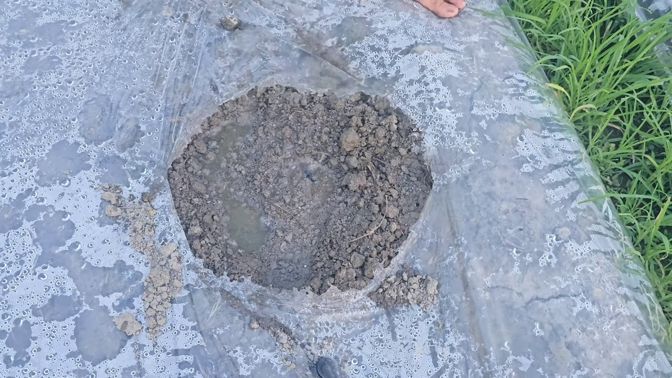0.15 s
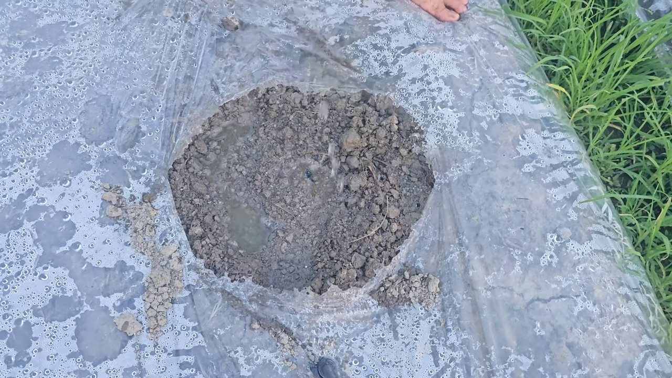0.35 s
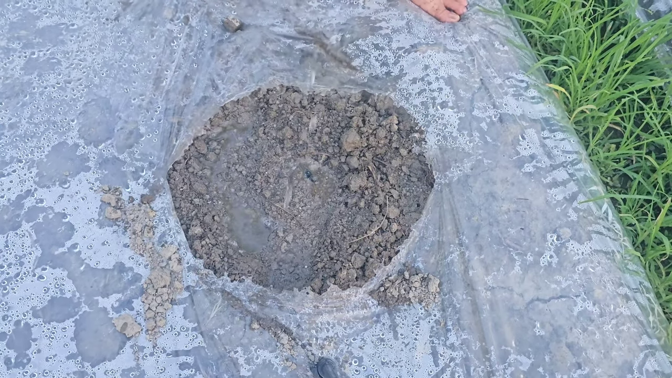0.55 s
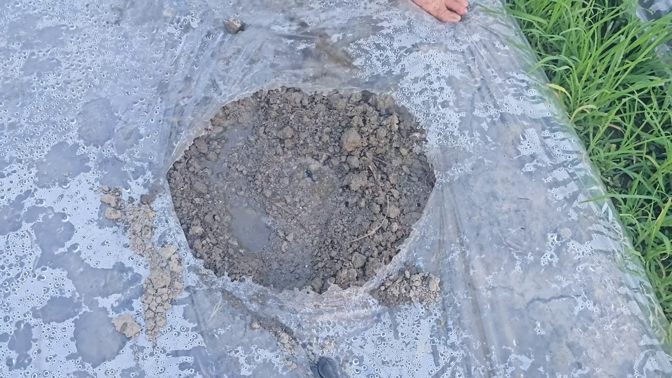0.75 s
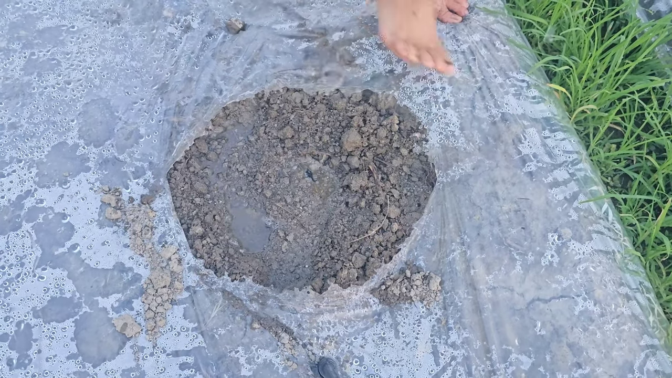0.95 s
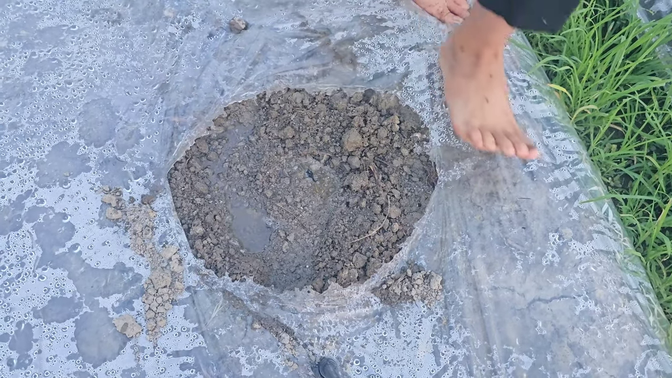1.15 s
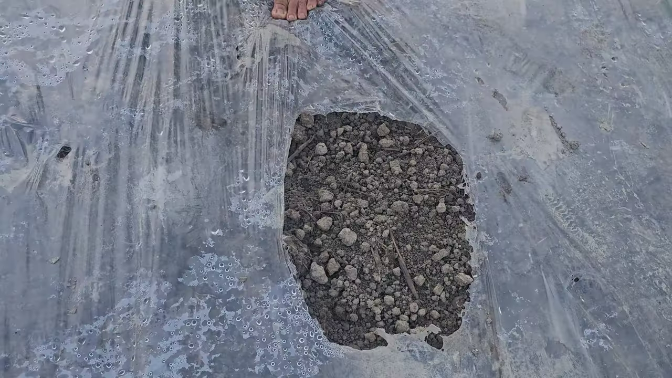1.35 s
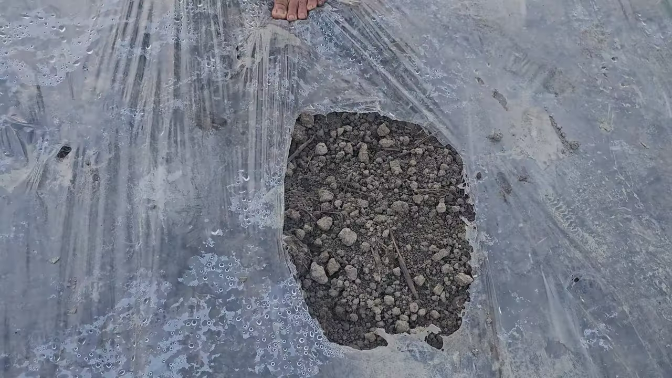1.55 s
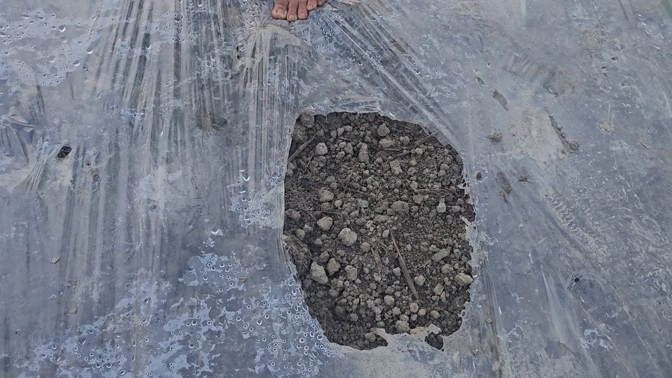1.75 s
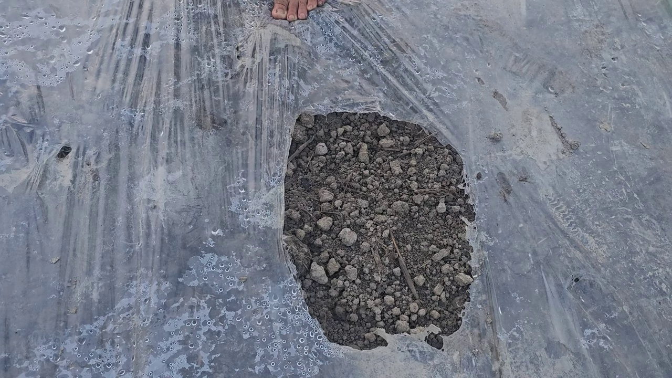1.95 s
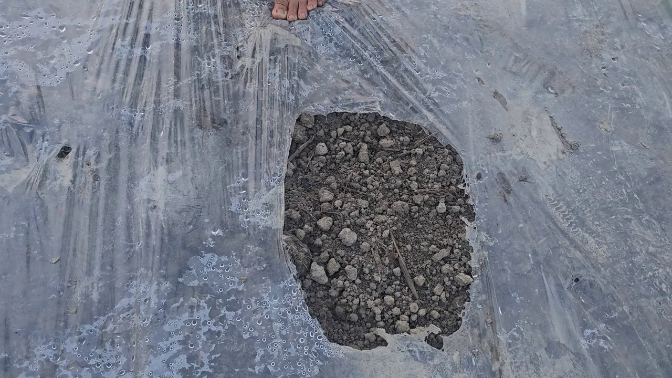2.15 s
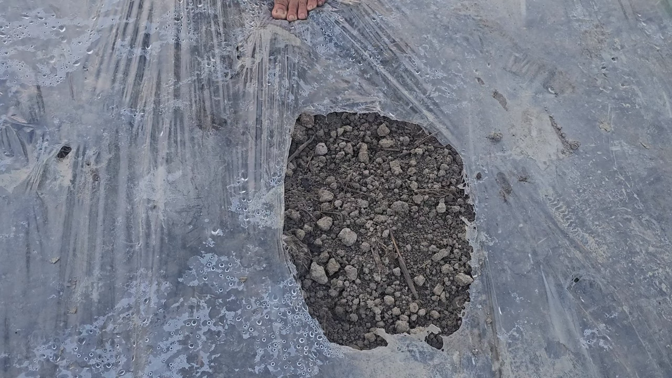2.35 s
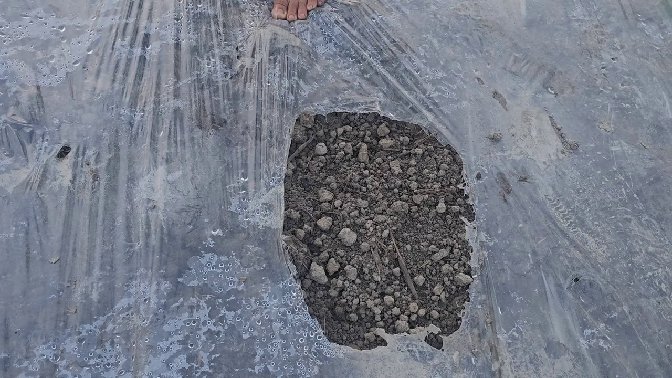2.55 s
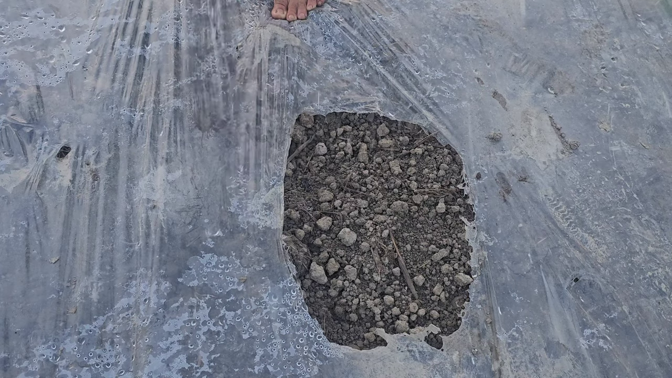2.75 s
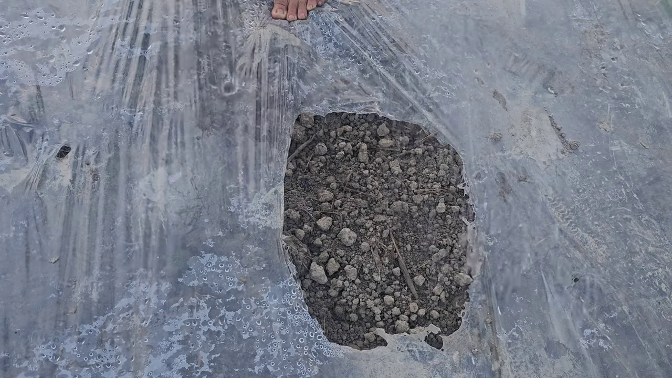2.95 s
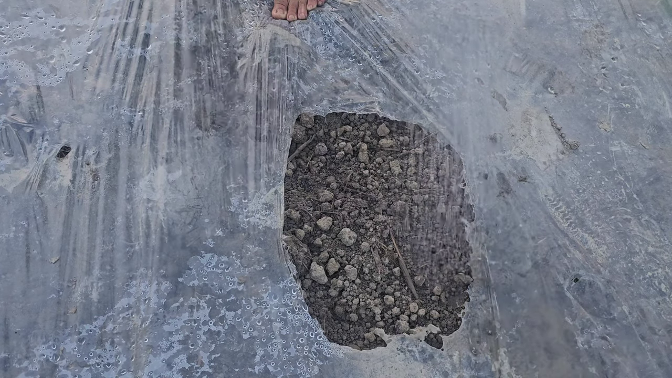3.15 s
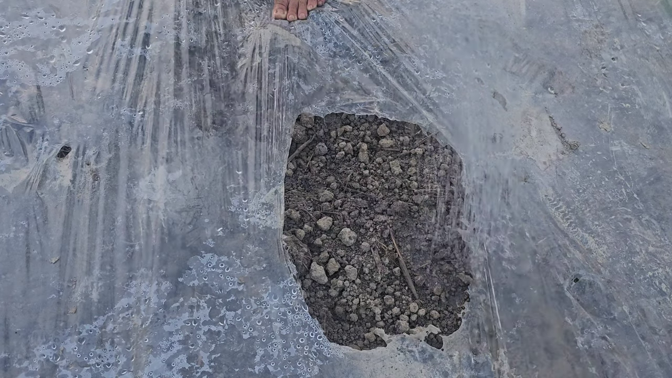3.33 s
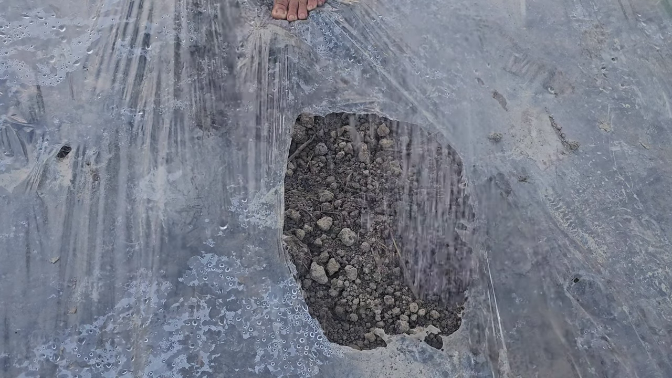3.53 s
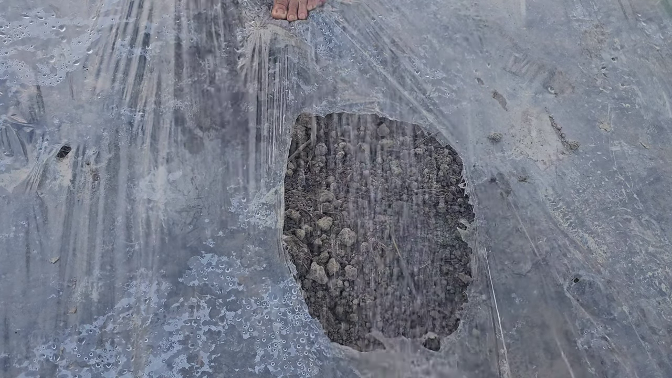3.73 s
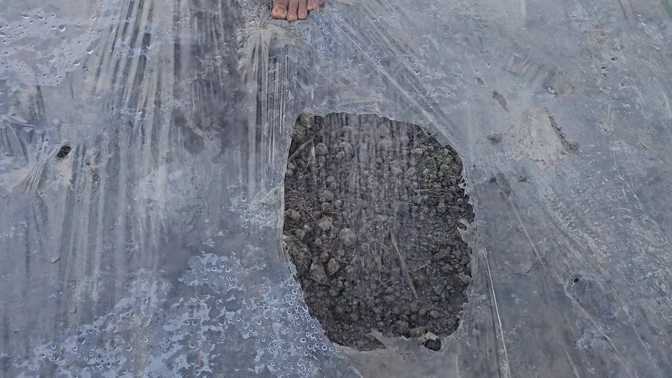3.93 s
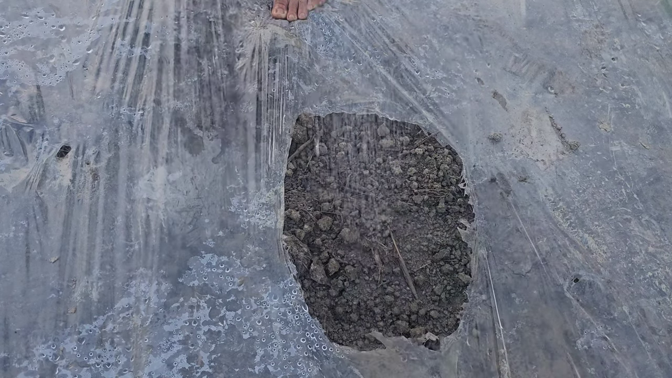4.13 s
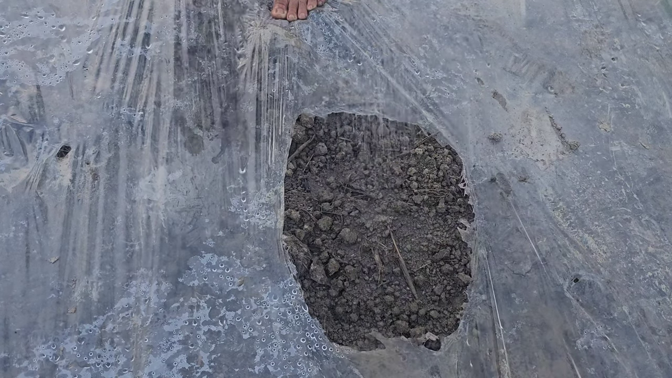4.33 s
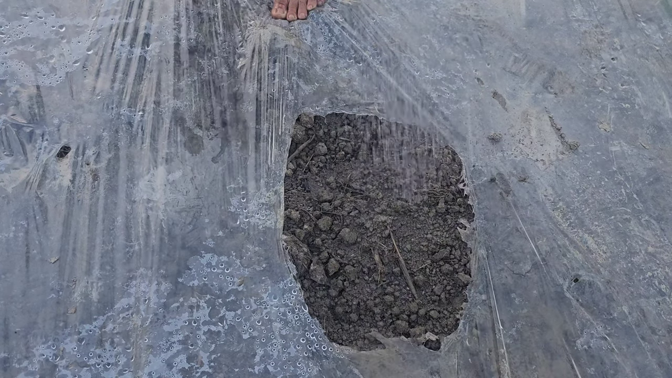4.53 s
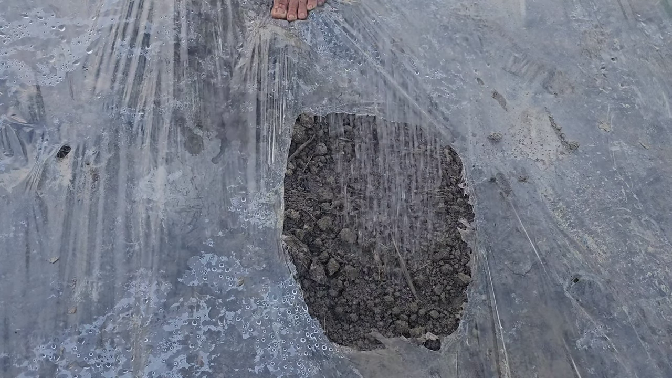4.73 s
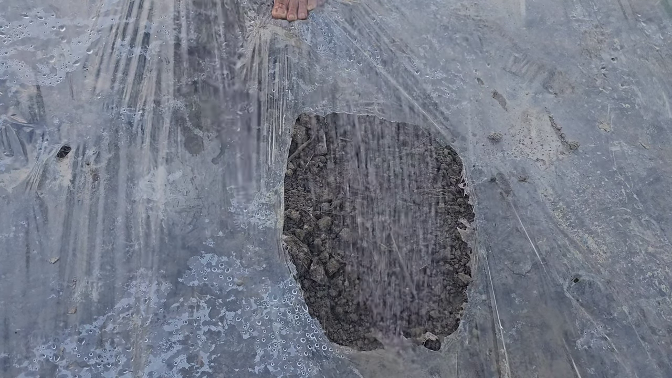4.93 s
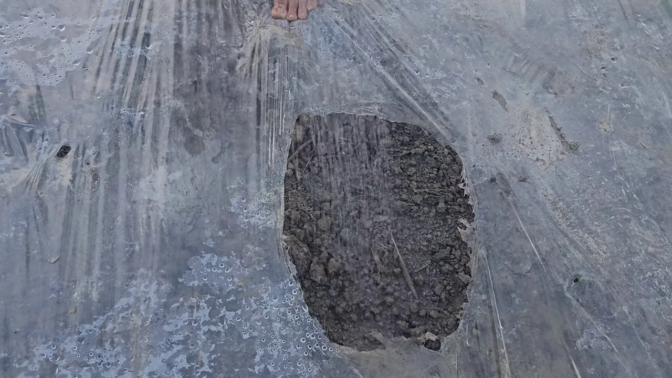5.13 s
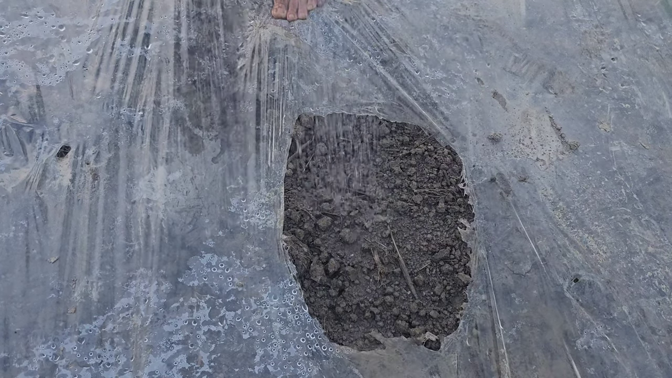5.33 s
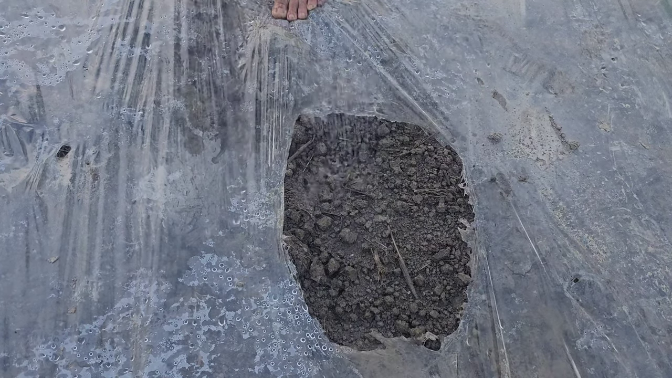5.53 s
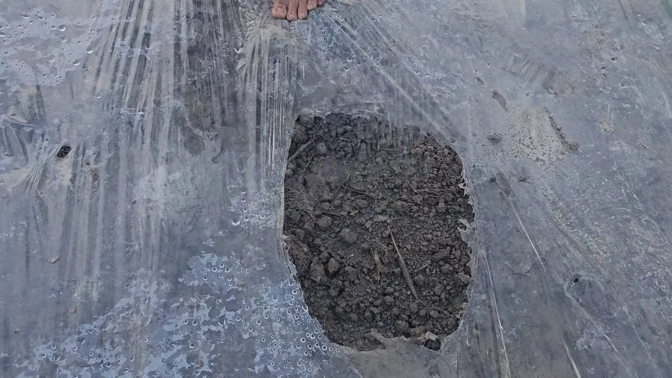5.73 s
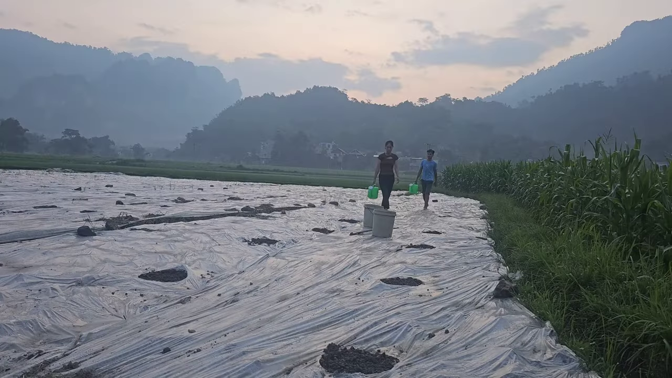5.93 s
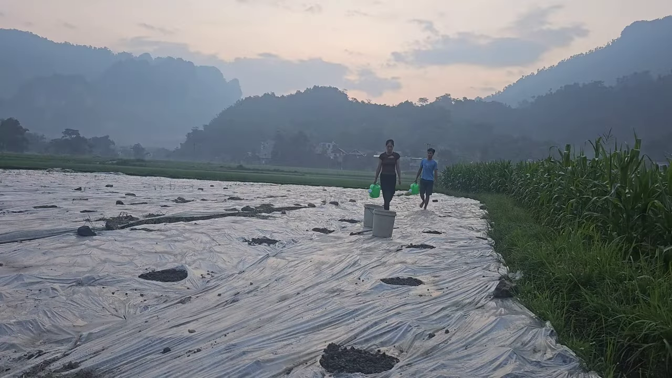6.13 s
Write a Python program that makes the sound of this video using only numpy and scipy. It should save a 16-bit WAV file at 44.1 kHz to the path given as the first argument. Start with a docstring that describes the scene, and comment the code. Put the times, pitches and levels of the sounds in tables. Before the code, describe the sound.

Close outdoor sound: stiff plastic sheeting crackles and thuds softly under a bare foot, with faint far bird whistles. After a brief dip come grit ticks and cricket chirps, then a can glugs and water spatters loudly on plastic, moving onto loose soil as wet, dull patter with fine hissing spray. It fades into quiet open field air with crickets and a faint distant engine hum.

```python
"""Watering a planting hole through plastic sheeting

Three outdoor passages joined by short fades. First a bare foot crackles on the sheet (swarms of clicks).
Then the can glugs (gliding sines), drops spatter on the plastic, and the shower settles on loose soil
(filtered random impacts). Last, the open field alone. Cricket bands and a far engine's hum (two harmonics)
lie behind; a far bird whistles (falling sines) over noise shaped as open air.
"""
import sys
import numpy as np
from scipy import signal
from scipy.fft import rfft, irfft
from scipy.io import wavfile
from scipy.ndimage import uniform_filter1d

SR = 44100
rng = np.random.default_rng(int(sys.argv[2]) if len(sys.argv) > 2 else 0)


def unload_audio(sound):
    """Save the sound as a 16-bit wav file, at the path given as the first command line argument."""
    columns = np.transpose(np.atleast_2d(sound))
    # keep every value between -1 and 1, then stretch to whole-number steps
    steps = np.round(np.clip(columns, -1, 1) * 32767)
    wavfile.write(sys.argv[1], SR, steps.astype(np.int16))


N = 276948
TIME = np.arange(N) / SR

# passages: [fade-in start t/s, fade-in length/s, fade-out end t/s, fade-out length/s, engine firing f/Hz]
PASSAGES = [(-.1, .09, 1.28, 0.11, 56.3), (1.392, 0.11, 5.885, .055, 54.27), (5.963, 0.18, 6.4, .09, 49.7)]
FADE_FLOOR_DB, CUTOFF_HZ = -44, 15700
EAR_SPREAD_MS, EAR_LEAD_MS = .1, .085  # right ear's delay behind the left: spread, mean

# open-air spectrum: [f/Hz, relative density/dB]
AIR_SPECTRUM = [(25, -3), (38, 10.5), (50, 20), (90, 18.5), (170, 3), (350, -2.5), (550, 1), (1100, -2),
                (2200, -4), (3300, -2.5), (4500, -4), (5600, -9), (11600, -14.5), (16000, -20.5)]
# left-right correlation of the air: [f/Hz, correlation/1]
AIR_CORRELATION = [(60, 1), (130, 0.93), (290, .8), (640, 0.18), (1410, -0.66), (3100, -0.019),
                   (7000, -0.14)]
# open-air background: [t/s, rms level/dB]
AIR_LEVEL = [(0, -50.5), (1.3, -56), (1.5, -53.5), (2.5, -48.5), (5.8, -56.5), (6.0, -51), (6.28, -49.5)]
# far engine's hum: [t/s, relative level/dB]
HUM_LEVEL = [(0, -59), (1.2, -51.5), (1.59, -54.5), (1.64, -42), (2.99, -45), (3.05, -49), (3.42, -53.5),
             (3.63, -39), (3.9, -51), (4.38, -41), (4.63, -50.5), (4.95, -46.5), (5.2, -61), (5.7, -48.5),
             (6.08, -65), (6.26, -43)]
# cricket chorus, one list per passage: [centre f/Hz, bandwidth/Hz, rms level/dB]
CHORUS_BANDS = [
    [(3860, 42, -66.5), (4020, 52, -65), (4130, 60, -67), (3790, 470, -66.5), (6470, 310, -75)],
    [(3900, 36, -63.5), (4046, 48, -63.5), (4117, 45, -65.5), (11700, 650, -68.5)],
    [(3430, 330, -56.5), (3920, 210, -62.5)],
]
# near cricket's bouts: [first chirp t/s, end t/s, relative level/dB]
CHIRP_BOUTS = [(1.532, 2.7, -64.5), (4.316, 5.7, -61.5)]
CHIRP_PERIOD_S, CHIRP_WIDTH_S = 0.1816, 0.033
# bird's whistles: [t/s, peak level/dB, starting f/Hz]
BIRD_WHISTLES = [(.575, -61, 3860), (.97, -60, 4080), (1.67, -66, 5280)]
WHISTLE_S, WHISTLE_FALL_HZ_PER_S = 0.11, 1500

# foot loading the sheet: [t/s, crease t60/s, thud-to-crackle offset before filter gains/dB]
FOOT_STEPS = [(0, 0.038, -4), (.065, .042, -0.5), (.85, .05, -24), (.9, 0.065, -4), (1.0, 0.064, -15),
              (1.8, 0.12, -0.5)]
# creases snapping: [t/s, relative level/dB]
CREASES = [(0.03, -26), (.057, -33.5), (0.07, -40), (0.076, -37), (0.104, -35.5), (0.13, -35.5),
           (.146, -36), (0.166, -37.5), (.177, -36), (.241, -40.5), (0.291, -39), (.871, -31), (0.919, -39),
           (0.935, -31.5), (1.0265, -26.5), (1.059, -34.5), (1.0835, -29), (1.122, -31.5), (1.16, -35.5),
           (1.184, -28.5), (1.885, -36), (1.917, -46), (2.179, -47.5), (2.36, -44)]
# grit and droplets ticking on the sheet: [t/s, relative level/dB]
GRIT_TICKS = [(.2803, -40.5), (0.447, -46), (.506, -41), (0.5464, -41), (.6394, -37.5), (.7068, -48),
              (1.027, -41), (1.515, -42), (1.6665, -41.5), (1.8533, -38), (1.8895, -38.5), (1.9462, -39),
              (2.019, -43), (2.4489, -41.5), (2.5106, -40.5), (2.687, -28.5), (2.723, -34.5),
              (5.8138, -34.5)]
# rustles as the weight shifts: [middle t/s, bell half length/s, relative level/dB]
RUSTLES = [(0, 0.0093, -43.5), (0.21, 0.11, -48.5), (0.596, .07, -49), (1.1, 0.22, -54.5),
           (2.335, 0.03, -60.5)]
# crease crackle spectrum: [f/Hz, relative density/dB]
CRACKLE_SPECTRUM = [(100, -0.5), (200, -2.5), (330, -12), (500, -2), (700, -5), (900, -4.5), (1080, -0.5),
                    (1420, 2.5), (2000, -3), (2500, -7.5), (2850, -6), (3450, -11.5), (4500, -13.5),
                    (7000, -19.5), (16000, -29.5)]
# spectrum of thuds in the soil below: [f/Hz, relative density/dB]
THUD_SPECTRUM = [(50, -11.5), (110, 4), (240, 1), (370, -3), (520, 3.5), (700, -9), (880, 0.5), (2000, -34),
                 (8000, -54)]
# grit spectrum: [f/Hz, relative density/dB]
GRIT_SPECTRUM = [(1500, -22), (4000, -2.5), (7000, -1), (11000, 1), (16000, -7)]

# air gulping into the can: [t/s, relative level/dB, starting f/Hz, t60/s]
CAN_GLUGS = [(2.207, -44, 246, 0.097), (2.587, -39, 242.5, 0.12), (2.67, -31, 265, 0.049),
             (2.697, -35.5, 252, 0.12)]
# heavy drops thudding into mud: [t/s, relative level/dB]
MUD_PLOPS = [(4.179, -27), (4.209, -26), (4.373, -28), (4.419, -30), (5.234, -31), (5.274, -27),
             (5.321, -29), (5.352, -27), (5.396, -25.5), (5.584, -30)]
# tiny upward-chirping bubbles: [t/s, relative level/dB, starting f/Hz]
BUBBLE_PLINKS = [(3.150, -38, 7700), (3.213, -33.5, 5730), (4.033, -35, 6160), (4.085, -43, 8450),
                 (4.152, -37, 6560), (4.886, -32, 5200)]

# pour: [t/s, relative drop rate/(1/s), share on plastic rather than soil/1]
POUR_DROPS = [(2.45, 310, 1), (2.8, 1820, 0.88), (3.05, 3500, 0.8), (3.3, 1350, 0.47), (3.8, 2030, 0.88),
              (4.15, 600, 0.01), (5.0, 890, 0.05), (5.85, 500, 0)]
# patter of the flow from the rose: [t/s, relative level/dB]
PATTER_LEVEL = [(2.45, -63.5), (2.62, -50.5), (2.68, -44), (2.79, -36), (3.05, -35), (3.18, -39.5),
                (3.32, -37.5), (3.98, -39.5), (4.3, -43.5), (4.5, -43.5), (4.62, -45), (4.98, -39.5),
                (5.3, -45), (5.55, -40), (5.85, -46)]
# fine spray: [t/s, relative level/dB]
SPRAY_LEVEL = [(2.45, -70), (2.98, -53.5), (3.03, -48), (4.3, -49), (5.1, -46), (5.74, -49.5),
               (5.85, -57.5)]
# brief falters and gushes: [t/s, level change/dB]
STREAM_LURCHES = [(2.745, -6), (2.862, -2.5), (2.9, 0.5), (2.99, -8), (3.135, -9.5), (3.55, -3.5),
                  (4.108, -9.5), (4.29, -8), (5.045, 4), (5.45, -3)]
LURCH_S = 0.013
# biggest gobs landing: [t/s, relative level/dB]
GOBS = [(2.583, -36.5), (2.648, -29), (2.721, -31), (2.766, -22.5), (2.778, -26.5), (2.811, -24.5),
        (2.884, -27.5), (2.956, -26.5), (3.023, -20), (3.04, -22.5), (3.493, -34), (3.564, -33),
        (3.62, -28.5), (4.055, -30), (4.495, -27), (4.601, -28), (4.689, -29), (4.948, -25), (5.144, -26.5),
        (5.321, -28.5), (5.511, -28)]
SPLAT_T60_S, THINNING_DB = 0.054, 6  # gob spatter decay; thinning of the stream just before each gob
# jets crossing the hole's plastic rim: [t/s, time on it/s, relative splashing level/dB]
RIM_PASSES = [(2.77, 0.14, -48), (3.026, 0.026, -31.5), (3.29, .18, -42.5), (3.686, 0.095, -38),
              (3.85, 0.038, -47), (4.36, 0.19, -48), (5.52, 0.22, -47.5)]
PASS_ATTACK_DB_PER_S, PASS_RELEASE_DB_PER_S = 401, 205
# drops on plastic: [f/Hz, relative density/dB]
PLASTIC_SPECTRUM = [(60, -12), (130, -13), (250, 0.5), (345, -11.5), (510, 5), (700, -4.5), (890, 2),
                    (1050, -4.5), (1300, -1.5), (1950, -10.5), (2600, -16.5), (4300, -22), (8000, -32),
                    (16000, -41)]
# drops on soil: [f/Hz, relative density/dB]
SOIL_SPECTRUM = [(50, -3), (105, 7), (170, 1.5), (250, 4), (350, -3), (520, 3.5), (690, -5), (850, 4.5),
                 (1020, -5.5), (1280, 1), (2000, -9.5), (2700, -11), (5000, -28.5), (16000, -44)]
# fine spray: [f/Hz, relative density/dB]
SPRAY_SPECTRUM = [(1500, -14.5), (3000, -0.5), (4500, 0.5), (6400, 0), (7200, 1.1), (9500, -1),
                  (11500, 0.7), (12500, -2), (16000, -2)]
# gobs: [f/Hz, relative density/dB]
SPLAT_SPECTRUM = [(60, -20), (250, 0), (345, -11), (510, 3.5), (700, -1.5), (880, -1), (1050, -0.5),
                  (1350, 0.5), (2000, -2), (2700, -23), (5000, -14.5), (16000, -27.5)]
# splashing on the rim: [f/Hz, relative density/dB]
SPLASH_SPECTRUM = [(300, -26), (900, -10), (1400, -1), (2000, -0.5), (2700, -4.5), (3500, -9), (5000, -14),
                   (7500, -17.5), (16000, -27.5)]


def from_db(db):
    """Decibels to amplitude gain."""
    return np.exp(np.asarray(db) * (np.log(10) / 20))


def rms_one(x):
    """Scale to rms 1."""
    return x / np.sqrt(np.mean(x ** 2) + 1e-20)


def in_time(rows):
    """One curve per column, linear between rows."""
    s, *columns = np.transpose(rows)
    return [np.interp(TIME, s, c) for c in columns]


def at_hz(points, hz):
    """Read a table on a log-frequency axis."""
    f, value = np.transpose(points)
    return np.interp(np.log(hz + 1), np.log(f), value)


def during(start, end):
    """Gate with 20 ms linear edges outside the interval."""
    return np.clip((TIME - start) / .02 + 1, 0, 1) * np.clip((end - TIME) / .02 + 1, 0, 1)


def held(start, end, attack_db_per_s, release_db_per_s):
    """Envelope in dB: climbs to 0 at the start, holds, sinks after the end."""
    return -attack_db_per_s * np.maximum(start - TIME, 0) - release_db_per_s * np.maximum(TIME - end, 0)


def swell(s, width):
    """Gaussian bell around this moment."""
    return np.exp(-.5 * np.minimum(((TIME - s) / width) ** 2, 100))


def drift(rate):
    """Slow random curve of rms 1: noise drawn at 1/40 of the sample rate, low-passed near this rate in Hz, then
    interpolated."""
    r = np.exp(-80 * np.pi * rate / SR)
    noise = rng.standard_normal(N // 40 + 2002)
    slow = signal.lfilter([1], [1, -2 * r, r * r], noise)[2000:]  # drop the filter's start-up
    return np.interp(np.arange(N) / 40, np.arange(len(slow)), rms_one(slow))


def colour(x, spectrum):
    """Causal minimum-phase filter with this spectrum; white input keeps its power."""
    size = 4096
    gain = rms_one(from_db(at_hz(spectrum, np.arange(size // 2 + 1) * SR / size)))
    cepstrum = irfft(np.log(gain))
    cepstrum[1:size // 2] *= 2
    cepstrum[size // 2 + 1:] = 0
    response = irfft(np.exp(rfft(cepstrum)))
    return signal.oaconvolve(x, response[None], axes=1)[:, :N]


def impacts(per_s, size_db, clump_db=0, count=3):
    """Stereo clicks of uneven size, clumped, each with its own ear lag and smaller followers; slow level 1."""
    chances = N // 4
    at = rng.integers(0, N - 500, chances)
    lands = rng.random(chances) * chances / N < np.broadcast_to(per_s, N)[at] / SR
    level_db = size_db * np.minimum(rng.exponential(1, chances), 4) + clump_db * drift(35)[at]
    sizes = from_db(level_db)[lands]
    lags_ms = rng.normal(EAR_LEAD_MS, EAR_SPREAD_MS, chances)[lands]
    lags = (lags_ms * SR / 1000).round().astype(int)
    clicks, when = np.zeros((2, N)), at[lands]
    for k in range(count):
        sign, wait = rng.random((2, chances))[:, lands]
        signed = sizes * np.sign(sign - .5) * from_db(-2.5 * k)
        clicks[0, when] += signed
        clicks[1, when + lags] += signed
        when = when + (wait * .002 * SR).astype(int)
    power = uniform_filter1d(uniform_filter1d(clicks[0] ** 2, size=3500), size=3500)
    return clicks / np.sqrt(np.maximum(power, 1e-6))


def bursts(rows, snap):
    """Each (t/s, level/dB, t60/s) is one sharp click and a decaying swarm of clicks."""
    envelope, first = np.zeros(N), np.zeros(N)
    for s, db, t60 in rows:
        i = round(s * SR)
        age = TIME[:min(N - i, SR // 4)]
        envelope[i:i + len(age)] += from_db(db) * np.exp(-np.log(1000) * age / np.clip(t60, .008, .15))
        first[i] -= snap * from_db(db)
    return first + envelope * impacts(10000, size_db=1.5, count=1)


def scatter(x, t60, wet_db):
    """Ground and nearby plants return a faint diffuse tail: decaying noise, independent per side."""
    age = TIME[:SR // 8]
    tail = rng.standard_normal((2, len(age))) * np.exp(-np.log(1000) * age / t60) * (age > .002)
    tail /= np.sqrt(np.sum(tail ** 2, axis=1, keepdims=True))
    bright = signal.sosfilt(signal.butter(1, 900, "high", fs=SR, output="sos"), x)
    return x + from_db(wet_db) * signal.oaconvolve(bright, tail, axes=1)[:, :N]


def passage_gates():
    """One gate per passage, changing over midway between the fades."""
    joins = [(before[2] + after[0]) / 2 for before, after in zip(PASSAGES, PASSAGES[1:])]
    edges = [0] + joins + [N / SR]
    return [during(start, end) for start, end in zip(edges, edges[1:])]


def field():
    """Open air: shaped noise, low rumble shared by both sides, most of the treble not."""
    hz = np.arange(N // 2 + 1) * SR / N
    mid, side = rfft(rng.standard_normal((2, N))) * from_db(at_hz(AIR_SPECTRUM, hz))
    alike = np.clip(at_hz(AIR_CORRELATION, hz), -1, 1)
    air = irfft(np.sqrt(1 + alike) * mid + np.sqrt(1 - alike) * side * [[1], [-1]], N)
    return from_db(in_time(AIR_LEVEL)[0]) * rms_one(air)


def engine():
    """Far engine: wavering firing rate and a weak octave, leading in phase on the left."""
    gates = passage_gates()
    hz = sum(gate * passage[-1] for gate, passage in zip(gates, PASSAGES)) / sum(gates)
    wavering_hz = hz * (1 + 0.022 * drift(10.3))
    phase = 2 * np.pi * np.cumsum(wavering_hz) / SR + 0.09 * np.array([[1], [-1]])
    level = from_db(in_time(HUM_LEVEL)[0] + 0.1 + 1.1 * drift(17))
    return np.sqrt(2) * level * (np.sin(phase) + from_db(-23.5) * np.sin(2 * phase))


def trill(hz, width_hz):
    """Many wings near one pitch: band-passed noise of rms 1, independent per side."""
    band = signal.butter(2, [hz - width_hz / 2, hz + width_hz / 2], "band", fs=SR, output="sos")
    return rms_one(signal.sosfilt(band, rng.random((2, N)) - .5))


def crickets():
    """Steady chorus of noise bands per passage, plus a nearer insect chirping at an even pace."""
    chorus = 0
    for gate, bands in zip(passage_gates(), CHORUS_BANDS):
        chorus = chorus + gate * sum(from_db(db) * trill(hz, width) for hz, width, db in bands)
    chirps = 0
    for first, end, db in CHIRP_BOUTS:
        for s in np.arange(first, end, CHIRP_PERIOD_S):
            chirps = chirps + from_db(db) * swell(s, CHIRP_WIDTH_S)
    near_voice = trill(4360, 120) * from_db(1) + trill(4210, 520) * from_db(10.5)
    return chorus + chirps * near_voice


def bird():
    """Far whistles: each sine swells and fades while its pitch falls linearly."""
    out = np.zeros(N)
    for s, db, hz in BIRD_WHISTLES:
        age = np.clip(TIME - s, 0, WHISTLE_S)
        cycles = age * (hz - WHISTLE_FALL_HZ_PER_S * age / 2)
        out += from_db(db) * np.sin(np.pi * age / WHISTLE_S) * np.sin(2 * np.pi * cycles)
    return out


def sheet():
    """Creases snap under the foot, which thuds softly on the soil below; grit ticks and rustles."""
    creases = []
    for s, db in CREASES:
        step = FOOT_STEPS[sum(s >= later[0] for later in FOOT_STEPS[1:])]  # the latest step
        creases.append((s, db, *step[1:]))
    snap_rows = [(s, db, t60) for s, db, t60, thud in creases]
    thud_rows = [(s, db + thud, t60) for s, db, t60, thud in creases]
    snaps = colour(bursts(snap_rows, snap=3.9), CRACKLE_SPECTRUM) * from_db(-5.5)
    thuds = colour(bursts(thud_rows, snap=8.3), THUD_SPECTRUM) * from_db(-6.5)
    grit = colour(bursts([(s, db, .014) for s, db in GRIT_TICKS], snap=0.53), GRIT_SPECTRUM) * from_db(-2.0)
    rustle = sum(from_db(db) * swell(s, width) for s, width, db in RUSTLES)
    rubbing = colour(impacts(830, size_db=-2.5, clump_db=2.5), CRACKLE_SPECTRUM) * from_db(-4.5)
    dust = colour(impacts(400, size_db=3.5, clump_db=3), GRIT_SPECTRUM) * from_db(-12)
    # the stretched sheet keeps ticking faintly while someone stands on it
    settling = colour(impacts(170, size_db=4.0, count=2), GRIT_SPECTRUM) * from_db(-63.0)
    settling = settling * during(1.45, PATTER_LEVEL[2][0])
    return snaps + thuds + grit + settling + rustle * (rubbing + dust)


def add_bubble(out, s, db, hz, t60, rise):
    """A pocket of air rings and dies; pitch glides up for positive rise, down for negative."""
    i = round(s * SR)
    life = TIME[:min(N - i, int(t60 * SR))] / t60
    cycles = hz * t60 * (life + rise * life ** 2 / 2)
    envelope = (1 - np.exp(-cycles)) * np.exp(-np.log(1000) * life)
    out[..., i:i + len(life)] += from_db(db) * np.sin(2 * np.pi * cycles) * envelope


def bubbles(count=60):
    """The can gulps low, heavy drops plop with falling pitch, tiny bubbles plink upward in wet soil."""
    out = np.zeros((2, N))
    for s, db, hz, t60 in CAN_GLUGS:
        add_bubble(out, s, db + 6, hz, t60, rise=.15)
    for s, db in MUD_PLOPS:
        add_bubble(out, s, db + 12.5, hz=253, t60=0.015, rise=-0.93)
    for s, db, hz in BUBBLE_PLINKS:
        add_bubble(out, s, db + 3.5, hz, t60=0.0096, rise=1.6)
    # random plinks on alternate sides
    for k, (when, size, pitch) in enumerate(rng.random((count, 3))):
        s = 3.15 + 2.55 * when
        add_bubble(out[k % 2], s, -33 - 10 * size, 5000 + 6000 * pitch, t60=0.018, rise=0.82)
    return out


def ring(x, hz, cycles):
    """Resonance losing 60 dB in so many cycles; white input keeps its power."""
    r, w = from_db(-60 * hz / (cycles * SR)), 2 * np.pi * hz / SR
    resonance = signal.lfilter([1, 0, -r * r], [1, -2 * r * np.cos(w), r * r], x + 1e-18)
    return resonance * np.sqrt((1 - r * r) / 2)


def gurgle(per_s, cycles, size_db, count=18):
    """Drops trap air in puddles; pockets ring briefly at one of several pitches, leaning left or right."""
    out = np.zeros((2, N))
    for k, hz in enumerate(np.geomspace(430, 2100, count)):
        when, size, sign = rng.random((int(per_s * N / SR / count), 3)).T
        clicks = np.zeros(N)
        level_db = size_db * size ** 2 + at_hz(SOIL_SPECTRUM, hz)
        clicks[(when * N).astype(int)] = np.sign(sign - .5) * from_db(level_db)
        out[k % 2] += ring(clicks, hz, cycles) * np.sqrt(hz)
    return rms_one(out + 0.53 * out[::-1])


def shower():
    """Drops drum brightly on plastic and patter dully on soil; fine spray fizzes above."""
    pouring = during(PATTER_LEVEL[0][0], PATTER_LEVEL[-1][0])
    per_s, share = in_time(POUR_DROPS)
    share = np.clip(share, 0, 1)
    # the stream lurches, and thins just before each gob that it gathers
    thinning = THINNING_DB * sum(swell(s - .006, 0.0074) for s, db in GOBS)
    lurch_db = sum(db * swell(s, LURCH_S) for s, db in STREAM_LURCHES) - thinning
    patter = from_db(in_time(PATTER_LEVEL)[0] + lurch_db)
    plastic = np.sqrt(share) * colour(impacts(2 * per_s, size_db=6.5, clump_db=-0.8), PLASTIC_SPECTRUM)
    soil = np.sqrt(1 - share) * colour(impacts(1.5 * per_s, size_db=1.5, clump_db=1.5), SOIL_SPECTRUM)
    soil = soil * from_db(-0.5)
    puddles = gurgle(per_s=220, cycles=24, size_db=12) * from_db(-3.5)
    spray_db = in_time(SPRAY_LEVEL)[0] + 4.5 + 0.28 * lurch_db + .5 * drift(11)
    spray = colour(impacts(5000, size_db=3.5, clump_db=1.0, count=2), SPRAY_SPECTRUM) * from_db(spray_db)
    on_rim = 0
    for s, length, db in RIM_PASSES:
        on_rim = on_rim + from_db(db + held(s, s + length, PASS_ATTACK_DB_PER_S, PASS_RELEASE_DB_PER_S))
    splashing = colour(impacts(4000, size_db=2.5, clump_db=1.0), SPLASH_SPECTRUM) * on_rim * from_db(2.5)
    gobs = bursts([(s, db, SPLAT_T60_S) for s, db in GOBS], snap=6.9)
    splats = colour(gobs, SPLAT_SPECTRUM) * from_db(-6.5)
    return ((plastic + soil + puddles) * patter + spray + splashing) * pouring + splats


def scene():
    """The field all around, water and sheet close by."""
    background = field() + engine() + crickets() + bird()
    near = scatter(shower() + sheet(), t60=.06, wet_db=-15) + bubbles()
    return background + near


def record(dry):
    """Fade each passage in and out on S-shaped ramps down to a floor; low-pass the sum."""
    ramps = 0
    for start, rise, end, fall, _ in PASSAGES:
        ramps = ramps + np.clip(np.minimum((TIME - start) / rise, (end - TIME) / fall), 0, 1)
    faded = dry * np.maximum(np.sin(np.pi / 2 * ramps) ** 2, from_db(FADE_FLOOR_DB))
    return signal.sosfilt(signal.ellip(12, .1, 80, CUTOFF_HZ, fs=SR, output="sos"), faded)


dry = scene()
out = record(dry)
unload_audio(out)
```